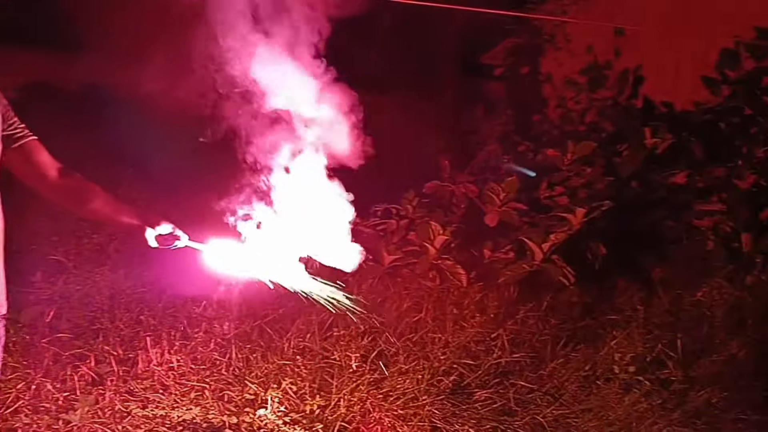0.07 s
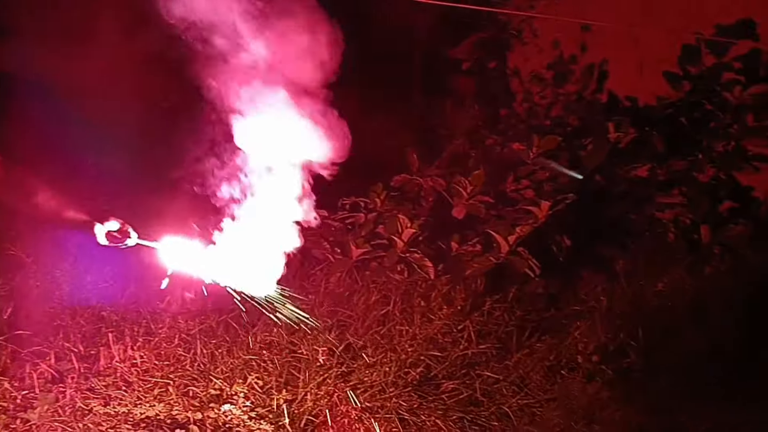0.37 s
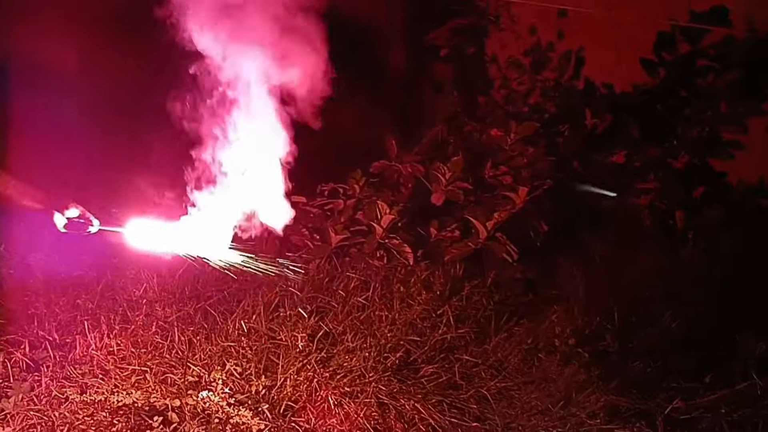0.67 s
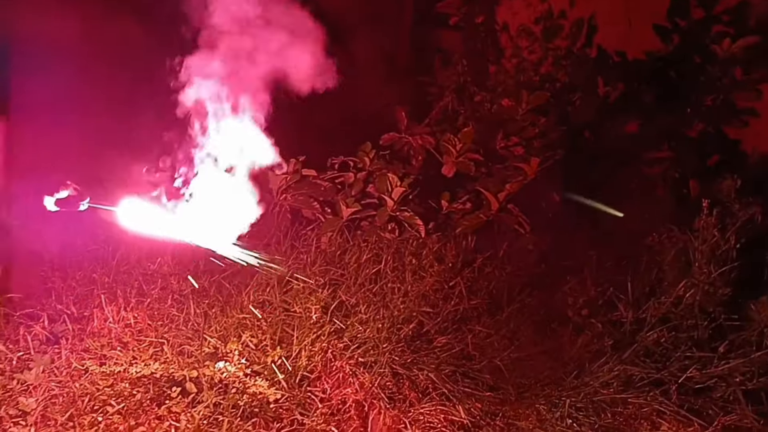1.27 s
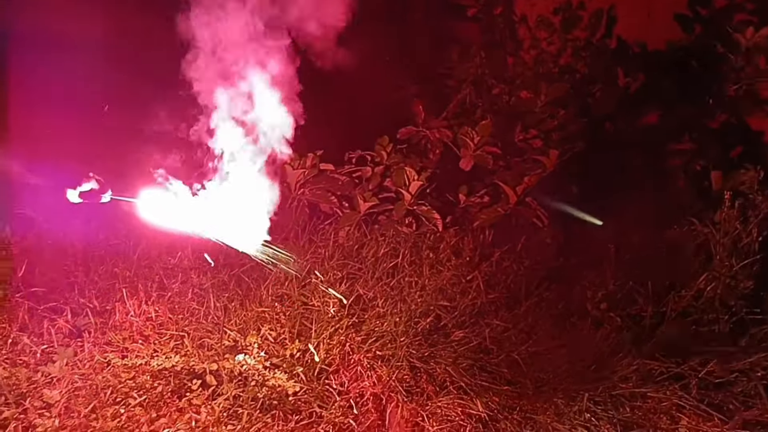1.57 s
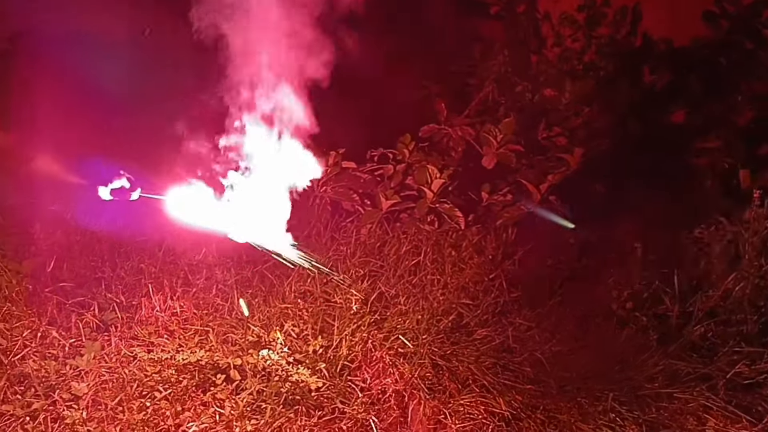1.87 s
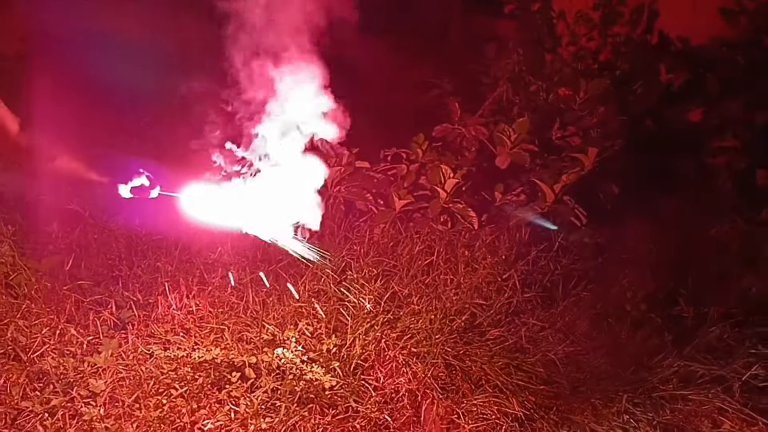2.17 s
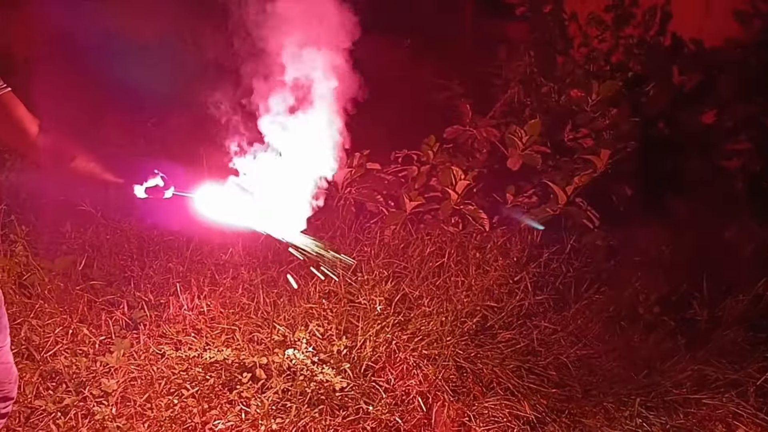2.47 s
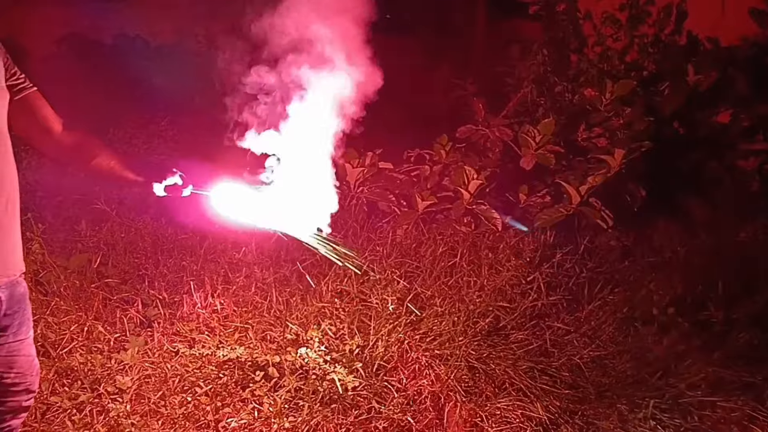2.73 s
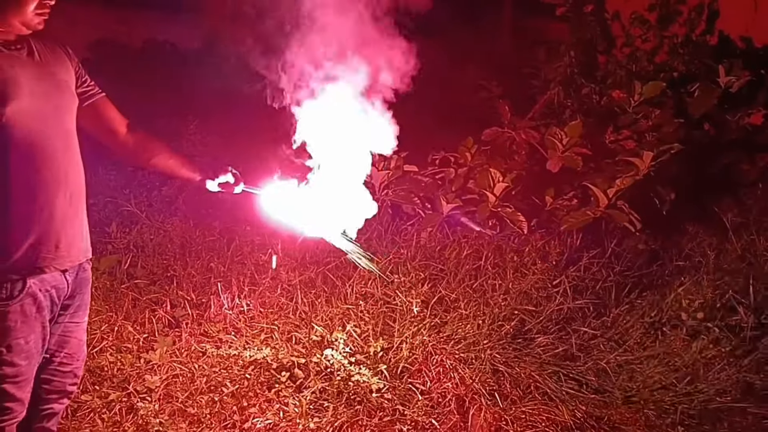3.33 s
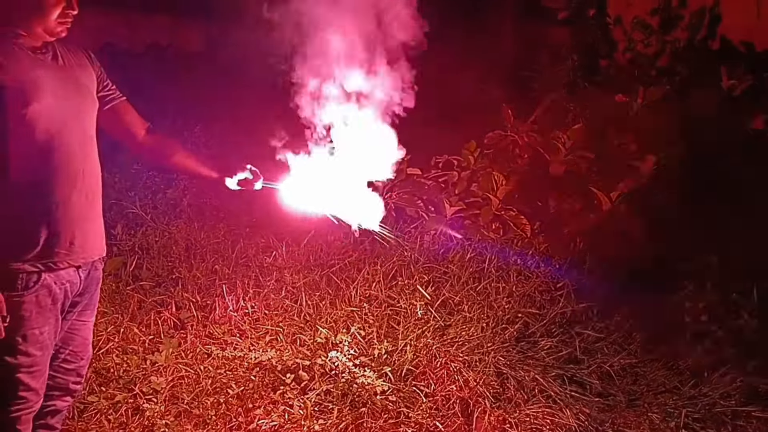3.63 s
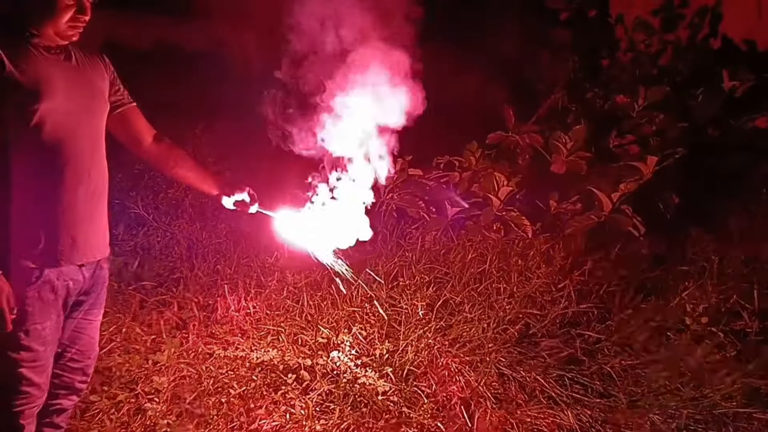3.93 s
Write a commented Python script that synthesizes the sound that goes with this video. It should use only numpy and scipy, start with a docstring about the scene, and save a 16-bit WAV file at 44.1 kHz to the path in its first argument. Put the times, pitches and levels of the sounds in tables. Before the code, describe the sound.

A handheld firework torch hisses throughout, with breathy whistles swelling and fading and soft low puffs of flame. Two crickets chirp close on the left and many more shrill around the stereo microphone, over dry grass at night.

```python
"""Dry grass at night, a stereo microphone near a handheld firework torch. From the start the jet hisses,
combed by its echo off the ground as the hand sways, and breathy whistles swell and fade in it.
Bush crickets shrill all around, two of them close by on the left. The flame rumbles in soft puffs,
thickest just past the middle. Far off, an engine slowly gathers speed and is loudest near the end."""
import sys
import numpy as np
from scipy import signal
from scipy.fft import rfft, irfft, next_fast_len
from scipy.io import wavfile
from scipy.ndimage import map_coordinates

SR = 44100
rng = np.random.default_rng(int(sys.argv[2]) if len(sys.argv) > 2 else 0)


def store_pcm(level_fs):
    """Save levels as 16-bit WAV."""
    pcm = np.round(np.clip(level_fs, -1, 1) * 32767).astype(np.int16)
    wavfile.write(sys.argv[1], SR, np.atleast_2d(pcm).T)


N = 176400

# lag of the ground echo at the left microphone as the torch sways: (time [s], lag [ms])
ECHO_LAG = [(0, 2.98), (.35, 2.89), (.67, 3.0), (1.05, 2.92), (1.4, 2.98), (2.0, 3.02), (2.85, 2.95),
            (3.12, 2.96), (3.45, 2.85), (3.7, 2.95), (3.8, 2.88), (3.92, 2.7), (4, 2.66)]


def amp(db):
    """Decibels to gain."""
    return 10 ** (np.asarray(db) / 20)


def unit(x):
    """Scaled to rms 1."""
    return x / np.sqrt(np.mean(x ** 2) + 1e-20)


def along(points, hz):
    """Each column after the frequency, read at hz on a log axis."""
    knots_hz, *columns = np.transpose(points)
    return np.array([np.interp(np.log(hz + 1), np.log(knots_hz + 1), c) for c in columns])


def curves(rows):
    """One value per sample for each column after the time."""
    times, *columns = np.transpose(rows)
    return [np.interp(np.arange(N) / SR, times, c) for c in columns]


def wobble(rate):
    """A smooth random curve, rate knots a second."""
    return map_coordinates(rng.standard_normal(N // 20), [np.arange(N) * rate / SR], mode="wrap")


def filtered(x, response):
    """x through a filter whose gain is response(hz)."""
    size = next_fast_len(N + 8192)
    return irfft(rfft(x, size) * response(np.fft.rfftfreq(size, 1 / SR)), size)[..., :N]


def rush(colour, alike, lead_ms=0):
    """Coloured stereo noise of rms 1; the sides share the fraction alike, the left leads by lead_ms."""
    noise = rng.standard_normal((3, N))
    pair = np.sqrt(alike) * noise[0] + np.sqrt(1 - alike) * noise[1:]
    advance_s = np.array([[.5], [-.5]]) * lead_ms / 1000
    return unit(filtered(pair, lambda hz: amp(along(colour, hz)) * np.exp(2j * np.pi * hz * advance_s)))


def wandering(x, depth_db, width_hz, life_s):
    """Narrow resonances swell and fade at random pitches, differently on each side, most above 2 kHz."""
    hz, times, spectrum = signal.stft(x, SR, nperseg=1024)
    grid = np.meshgrid(hz / width_hz, times / life_s, indexing="ij")
    field = np.array([map_coordinates(rng.standard_normal((400, 100)), grid, mode="wrap") for _ in x])
    swing_db = depth_db * np.interp(hz, [1300, 2400], [.3, 1])[:, None]
    _, coloured = signal.istft(spectrum * amp(swing_db * np.tanh(field)), nperseg=1024)
    return unit(coloured[:, :N])


def night_air():
    """The low murmur of the open air over the grass."""
    # spectrum of the air: (frequency [Hz], left [dB], right [dB])
    colour = [(29.6, -14, -15), (129, -5.5, 1), (224, 2, -1), (338, -1, -2), (470, -5.5, -10),
              (830, -2.5, -2), (990, -6, -25), (1840, 3, -9.5), (8000, -62, -51)]
    return amp(-70) * rush(colour, alike=.83)


def engine():
    """Far off to the right, an engine's low orders climb through its exhaust's resonances."""
    # the engine's run: (time [s], firing rate [Hz], relative level [dB])
    run = [(0, 24, -93), (1.6, 22.2, -78.5), (2.1, 26.5, -89), (2.6, 25, -67.5), (3.0, 27, -76.5),
           (3.65, 26.9, -74), (3.85, 27.05, -58.5), (4, 23, -59.5)]
    # resonances of the exhaust: (frequency [Hz], gain [dB])
    exhaust = [(80, -25), (105, -5), (127, 0), (136, -7.5), (150, -0.5), (162, 4), (180, -9.5), (215, -22),
               (300, -26)]
    firing_hz, level_db = curves(run)
    phase = 2 * np.pi * np.cumsum(firing_hz) / SR
    drone = np.zeros(N)
    for order in range(3, 11):
        order_db = along(exhaust, order * firing_hz)[0] + .57 * wobble(8.22)
        drone += amp(order_db) * np.sin(order * phase + rng.uniform(0, 2 * np.pi))
    return amp(level_db) * drone * amp([[-4], [3]])


def cricket_chorus():
    """Many far crickets all around the microphone merge into one throbbing, shrill band."""
    # spectrum of the chorus: (frequency [Hz], left [dB], right [dB])
    colour = [(4500, -94, -90), (5800, -55, -34), (6870, -7.5, -17), (7020, -2.5, -2.5), (7670, 1.5, -2),
              (8000, -2.5, -2.5), (8540, -6.5, -3), (9030, -12.5, -8), (9530, -25, -36), (10600, -63, -90)]
    # swells of the chorus: (time [s], relative level [dB])
    swells = [(0, -38), (.22, -38), (.4, -42), (.47, -40), (.6, -44.5), (.93, -44), (1.02, -38.5),
              (1.1, -46), (1.17, -38), (1.25, -43), (1.32, -42.5), (1.5, -39), (1.9, -39.5), (2.02, -41.5),
              (2.1, -39), (2.45, -39), (2.6, -37.5), (3.14, -39), (3.35, -43), (3.42, -47), (3.5, -42),
              (3.65, -49), (3.75, -38.5), (3.82, -50), (3.88, -40.5), (4, -54)]
    level_db, = curves(swells)
    shrill = wandering(rush(colour, alike=.034), depth_db=3, width_hz=79, life_s=.1534)
    throb_db = .6 * wobble(20) + 1.14 * wobble(110)
    return amp(level_db + 1 + throb_db) * shrill


def cricket(chirps, strokes, pitch_hz, level_db, left_db):
    """Each chirp is a few wing strokes, each a short tone that falls as the wing slows."""
    stroke_s, fall_hz_per_s = .011, 67000
    out = np.zeros((2, N + SR))
    t = np.arange(int(stroke_s * SR)) / SR
    swell = np.sin(np.pi * t / stroke_s)
    for chirp_s, chirp_db in chirps:
        for delay_s, stroke_db in strokes:
            detune, force, *side_phases = rng.standard_normal(4)
            hz = pitch_hz + 60 * detune - fall_hz_per_s * (t - stroke_s / 2)
            tone = np.sin(2 * np.pi * np.cumsum(hz) / SR + np.array(side_phases)[:, None] / 2)
            start = int((chirp_s + delay_s - stroke_s / 2) * SR)
            gain = amp(level_db + chirp_db + stroke_db + force / 2)
            out[:, start:start + len(t)] += gain * swell * tone
    return out[:, :N] * amp([[left_db / 2], [-left_db / 2]])


def close_crickets():
    """Two crickets rub their wings close by on the left, one lower and fainter than the other."""
    # chirps of the higher cricket: (time [s], relative level [dB])
    high_chirps = [(.036, -32.5), (.164, -31), (.283, -32.5), (.4, -33.5), (.519, -36.5), (.639, -32),
                   (.762, -33.5), (.911, -32), (1.028, -34), (1.15, -35), (1.273, -31.5), (1.39, -32),
                   (1.506, -35), (1.621, -34.5), (1.734, -31), (1.848, -32.5), (1.963, -39), (2.079, -35),
                   (2.189, -33), (2.307, -35.5), (2.429, -32), (2.663, -41), (2.76, -33), (2.96, -30.5),
                   (3.185, -37), (3.41, -36.5), (3.622, -35.5)]
    # chirps of the lower cricket: (time [s])
    low_times = [0.366, 0.474, 0.585, .697, 0.811, .92, 1.032, 1.144, 1.255, 1.367, 1.478, 1.588, 1.7,
                 1.816, 1.923, 2.031, 2.143, 2.255, 2.37, 2.478, 2.845, 2.984, 3.111, 3.261, 3.377, 3.497,
                 3.613, 3.73, 3.847, 3.963]
    # wing strokes in one chirp of each: (delay [s], relative level [dB])
    high_strokes = [(0, -5), (.019, -1), (.042, -12)]
    low_strokes = [(0, -1.3), (.017, 1)]
    high = cricket(high_chirps, high_strokes, pitch_hz=7120, level_db=-.5, left_db=9)
    low = cricket([(s, 0) for s in low_times], low_strokes, pitch_hz=6740, level_db=-41, left_db=12)
    return high + low


def flame():
    """Soft low puffs of the billowing flame swell out of a quiet rumble."""
    # puffs of the flame: (time [s], relative level [dB])
    puffs = [(.16, -70), (.36, -83), (0.628, -76), (.74, -78), (.88, -81), (.96, -69), (1.47, -79),
             (1.64, -72), (1.76, -70.5), (1.93, -69.5), (2.05, -69), (2.22, -68), (2.4, -68), (2.49, -65),
             (2.64, -63), (2.83, -66), (3.27, -73), (3.55, -74), (3.8, -77), (3.88, -80), (3.98, -73)]
    # spectrum of the rumble: (frequency [Hz], left [dB], right [dB])
    colour = [(20, -16, -27), (38.2, -28, -19), (57.4, -7.5, -1), (86.5, 0, -1.5), (132, 4.5, 0.5),
              (197, -9, -8.5), (334, -20.5, -28), (610, -45, -34)]
    puff_s, floor_db = .03, -79
    t = np.arange(N) / SR
    puff_power = sum(amp(db) ** 2 * np.exp(-((t - s) / puff_s) ** 2) for s, db in puffs)
    return amp(4.5) * np.sqrt(amp(floor_db) ** 2 + puff_power) * rush(colour, alike=.97)


def off_ground(x, echo, scatter):
    """Adds the ground's echo, whose lag follows the hand, and glints off grass tufts; rms 1."""
    # weak echoes from the tufts: (lag relative to the ground echo [ms])
    tuft_lags = [-1.35, -1.0, -.72, -.35, .43]
    right_lag_ms, glints_per_s = .035, 3
    lag_ms, = curves(ECHO_LAG)
    sides = []
    for direct, extra_ms in zip(x, (0, right_lag_ms)):
        reflected = map_coordinates(direct, [np.arange(N) - (lag_ms + extra_ms) * SR / 1000], order=5)
        glints = sum(np.tanh(wobble(glints_per_s)) * np.roll(reflected, round(ms * SR / 1000))
                     for ms in tuft_lags)
        sides.append(direct + echo * reflected + scatter * glints)
    return unit(np.array(sides))


def whistles():
    """Narrow, breathy resonances swell out of the jet; their pitch rises as the echo's lag shortens."""
    # whistles: (peak time [s], half-level width [s] / 2, pitch [Hz], level [dB], left over right [dB])
    notes = [(.2, .2, 3145, -55, 5), (.05, .25, 3760, -59.5, -10), (.39, .12, 3560, -72, 21),
             (0.728, .15, 2300, -58.5, -18), (.77, .15, 3770, -60, 17), (1.05, .15, 3060, -58, -20),
             (1.03, .15, 4460, -68, 19), (1.42, .15, 2600, -59.5, -20), (1.499, .12, 3076, -57, -4),
             (1.68, .13, 2270, -59, -19), (1.771, .13, 3096, -59, -10), (2.049, .12, 3057, -62, 10),
             (2.349, .15, 3100, -64, 7), (2.66, .15, 4090, -59, 15), (3.002, .15, 3040, -60, 10),
             (3.18, .13, 2380, -57.5, -18), (3.45, .15, 2971, -61, 15), (3.42, .2, 3540, -56, 14),
             (3.92, .1, 2186, -56.5, -20), (3.869, 0.13, 2842, -58, -12), (3.87, .2, 4500, -57, -20),
             (3.978, .1, 4190, -62, 13)]
    width_hz = 170
    t, out = np.arange(N) / SR, np.zeros((2, N))
    lag_ms, = curves(ECHO_LAG)
    for peak_s, half_s, hz, level_db, left_db in notes:
        sounding = np.abs(t - peak_s) < 2 * half_s
        pitch_hz = hz * np.interp(peak_s, t, lag_ms) / lag_ms[sounding]
        breath = (wobble(width_hz) + 1j * wobble(width_hz))[sounding]
        tone = unit(np.real(breath * np.exp(2j * np.pi * np.cumsum(pitch_hz) / SR)))
        swell = (1 + np.cos(np.pi * (t[sounding] - peak_s) / (2 * half_s))) / 2
        pan = unit(amp([[left_db / 2], [-left_db / 2]]))
        out[:, sounding] += amp(level_db) * swell * tone * pan
    return out


def torch_jet():
    """The jet's four bands and its whistles sputter together; the ground echo hollows the lower most."""
    # relative levels of the three lower bands: (time [s], rasp [dB], sharp edge [dB], hiss [dB])
    band_levels = [(0, -52, -51, -41), (.25, -54.5, -53, -41.5), (.5, -51.5, -54, -43.5),
                   (.75, -53.5, -53.5, -44), (1.05, -53, -53, -45), (1.4, -54, -59.5, -46),
                   (1.8, -53.5, -57.5, -46.5), (2.15, -52, -53, -44), (2.55, -51.5, -55.5, -44),
                   (2.95, -53, -54.5, -44.5), (3.25, -52, -54, -41), (3.42, -52.5, -56.5, -44.5),
                   (3.6, -55.5, -59, -44), (3.78, -55.5, -55.5, -43.5), (4, -53, -54, -44)]
    # the highest band, the fizz: (time [s], relative level [dB])
    fizz_levels = [(0, -52), (.5, -52), (1.05, -55.5), (1.4, -57.8), (1.9, -58.2), (2.5, -55), (2.95, -54),
                   (3.22, -52.6), (3.42, -56), (3.78, -53.3), (4, -56)]
    # spectra of the bands at the microphone: (frequency [Hz], left [dB], right [dB])
    rasp_colour = [(284, -25, -19.5), (674, -23.5, -20.5), (1085, -23.5, -17.5), (1385, -8, -1),
                   (1740, -28, -9), (2015, -20, 2), (2400, -13.5, 0.5), (2720, -19, 2.5), (2720, -12.5, -9),
                   (3075, 5, 3), (3380, -26, 1.5), (3670, -27, -25), (4800, -35, -20), (7100, -56, -52)]
    edge_colour = [(2000, -70, -70), (2900, -35, -50), (3570, -26, -25), (3420, -4, -17), (3705, 3.5, -24),
                   (3800, 0, -23), (4250, 3.5, -32), (4870, 2.5, -31), (5060, -32, -32), (7000, -51, -60)]
    hiss_colour = [(4050, -68, -40), (4560, -30, -24), (4920, -6.5, -1.5), (5620, 1, 1), (6090, -7.5, 0),
                   (7910, 3, 4), (8470, -6, -5), (9270, -25, -14.5), (9530, -31.5, -3), (10540, -2.5, -5),
                   (11420, -26, -30), (13700, -47, -55)]
    fizz_colour = [(4500, -80, -80), (6840, -41, -34), (8900, -2, 0), (10000, -9, -1), (12000, -2.5, 5.5),
                   (13300, 1.5, 1.5), (16000, -5.5, 1)]
    rasp_db, edge_db, hiss_db = curves(band_levels)
    fizz_db, = curves(fizz_levels)
    rasp = wandering(rush(rasp_colour, alike=.65, lead_ms=-.09), depth_db=4.5, width_hz=80, life_s=.2)
    edge = wandering(rush(edge_colour, alike=.2), depth_db=7, width_hz=80, life_s=.22)
    hiss = wandering(rush(hiss_colour, alike=.03), depth_db=3.5, width_hz=100, life_s=.2)
    rasp = off_ground(off_ground(rasp, echo=.95, scatter=.15), echo=.25, scatter=.4)
    edge = off_ground(off_ground(edge, echo=1, scatter=.1), echo=.35, scatter=.6)
    hiss = off_ground(hiss, echo=.8, scatter=.25)
    rasp *= amp(rasp_db - 1 + 1.57 * wobble(34.92))
    edge *= amp(edge_db + .5)
    hiss *= amp(hiss_db + 4.5 + .38 * wobble(50))
    fizz_gain = amp(fizz_db + 5.5 + .75 * wobble(6.7))
    fizz = fizz_gain * off_ground(rush(fizz_colour, alike=.03), echo=.2, scatter=.33)
    sputter_db, surge_db = .35 * wobble(130), .95 * wobble(22)
    return amp(sputter_db + surge_db) * (rasp + edge + hiss + fizz + whistles())


def scene():
    """Close crickets and the torch, with the chorus, the engine and the night air behind them."""
    return close_crickets() + torch_jet() + flame() + cricket_chorus() + engine() + night_air()


def record(dry):
    """The recorder keeps nothing above its band limit."""
    top_hz = 15600
    return filtered(dry, lambda hz: hz < top_hz)


dry = scene()
out = record(dry)
store_pcm(out)
```